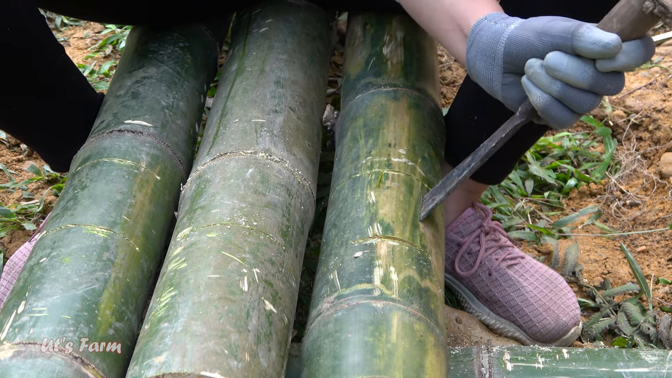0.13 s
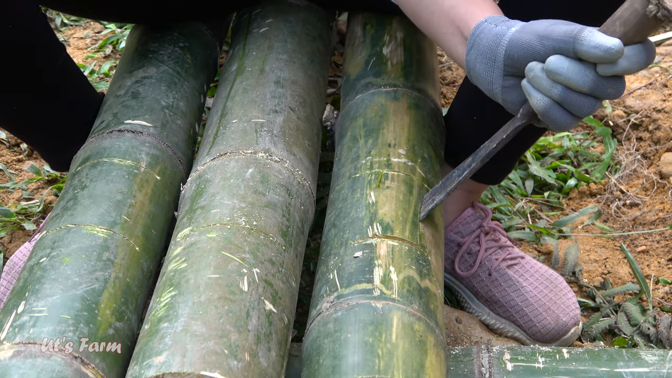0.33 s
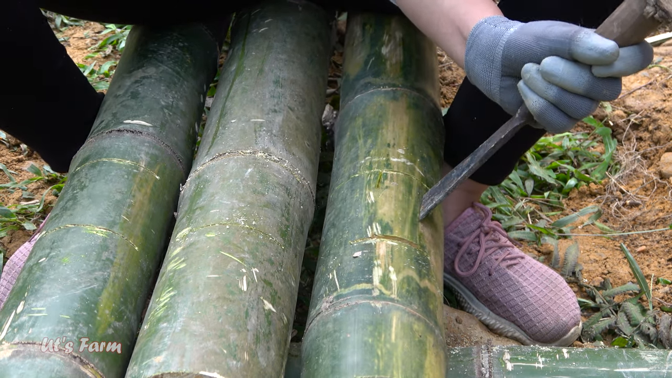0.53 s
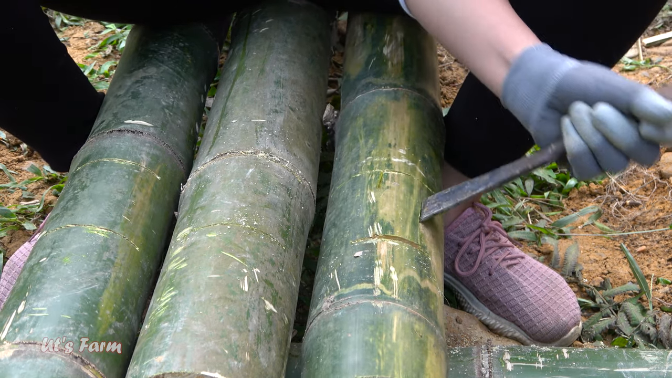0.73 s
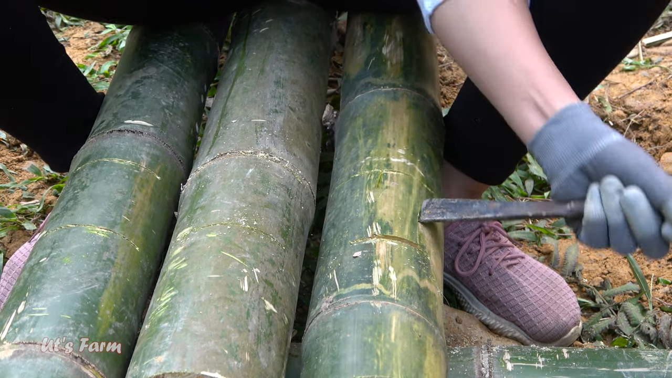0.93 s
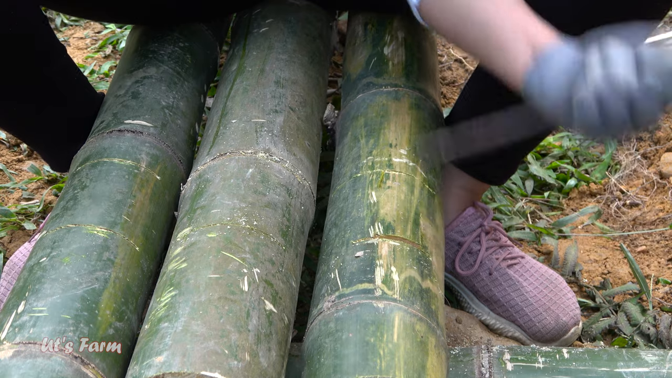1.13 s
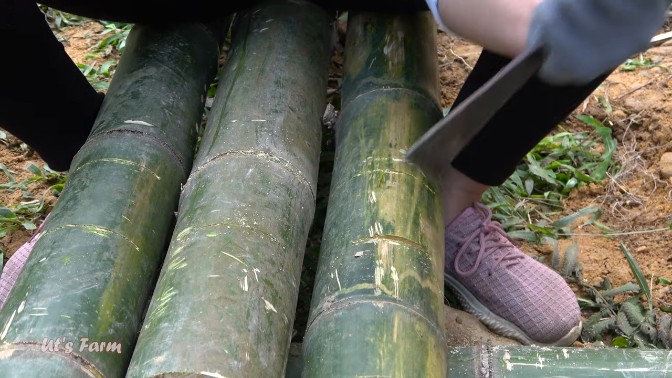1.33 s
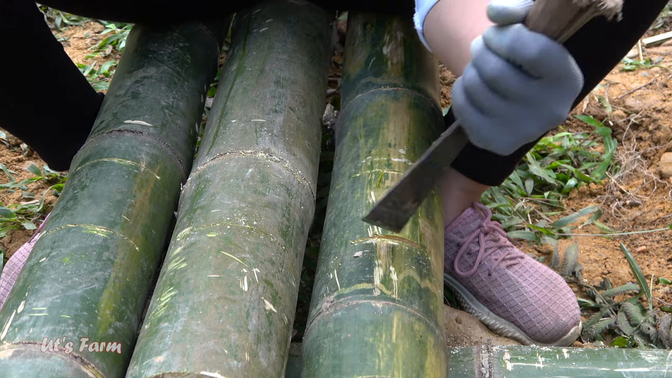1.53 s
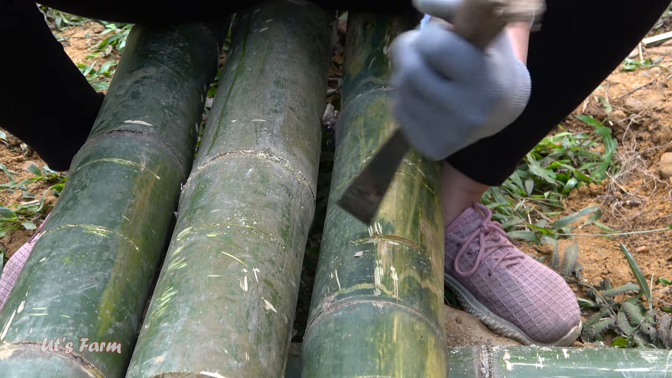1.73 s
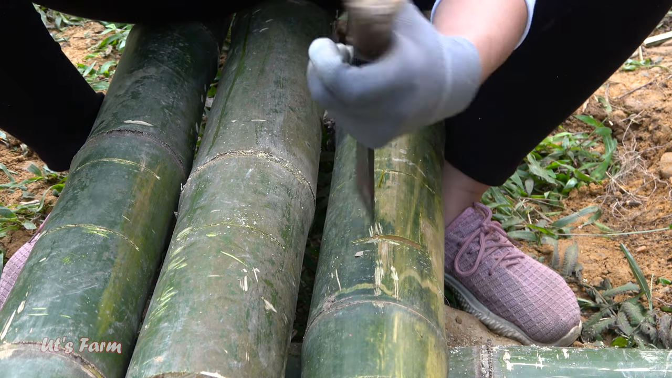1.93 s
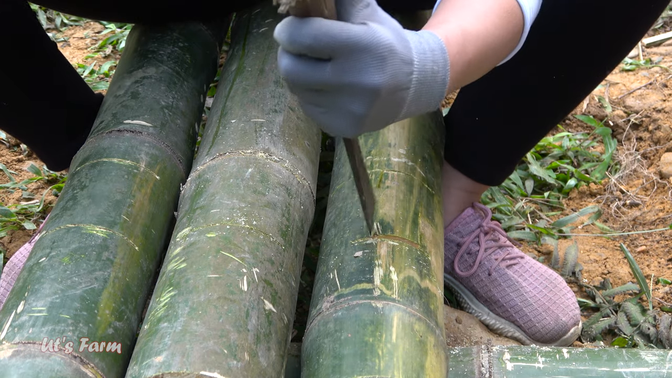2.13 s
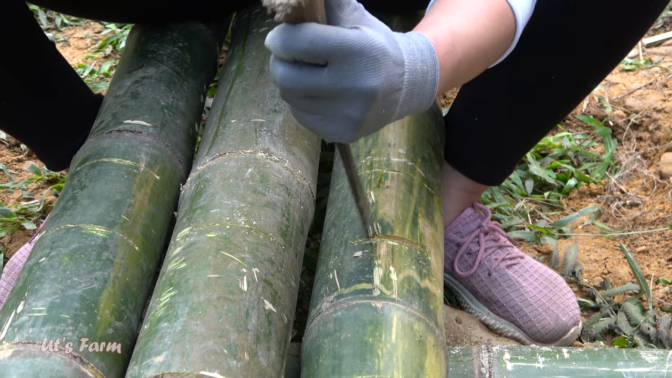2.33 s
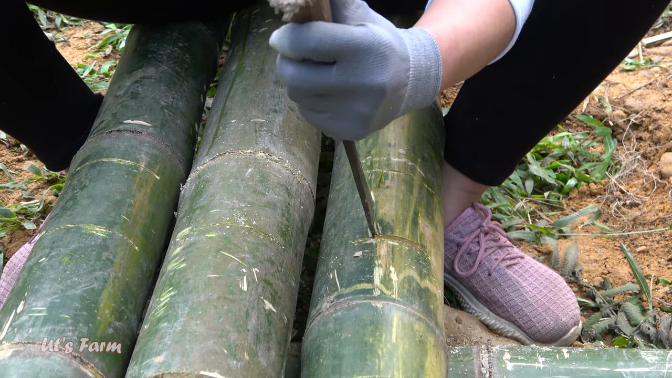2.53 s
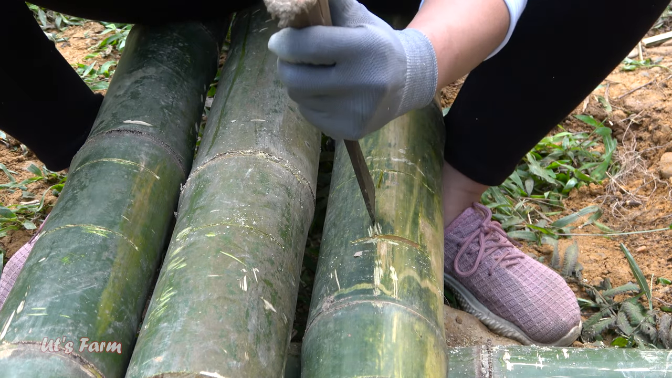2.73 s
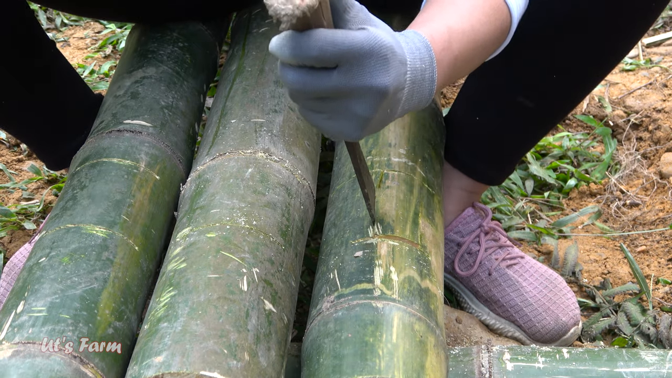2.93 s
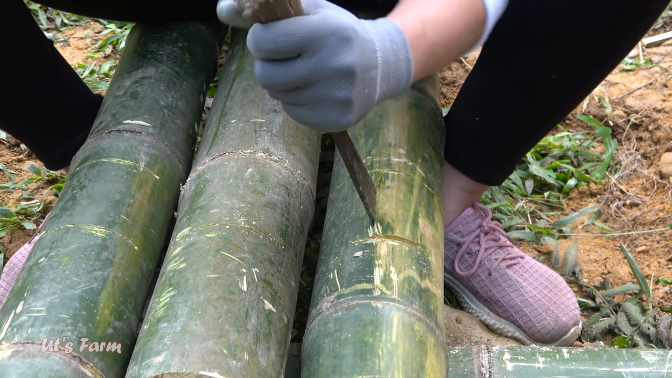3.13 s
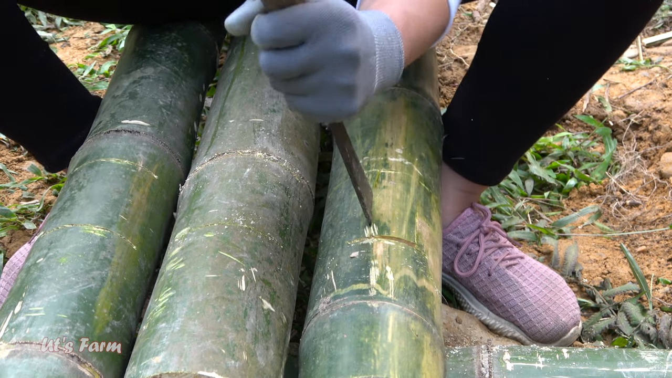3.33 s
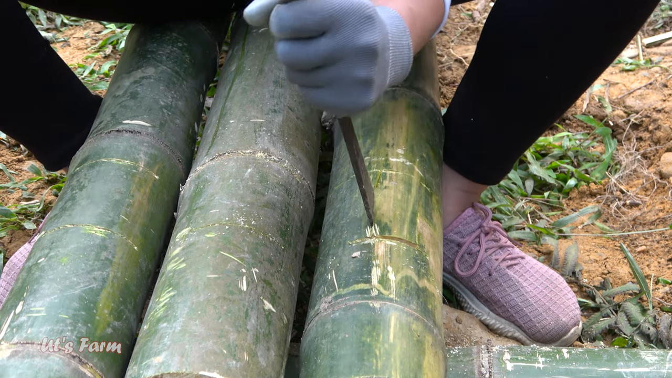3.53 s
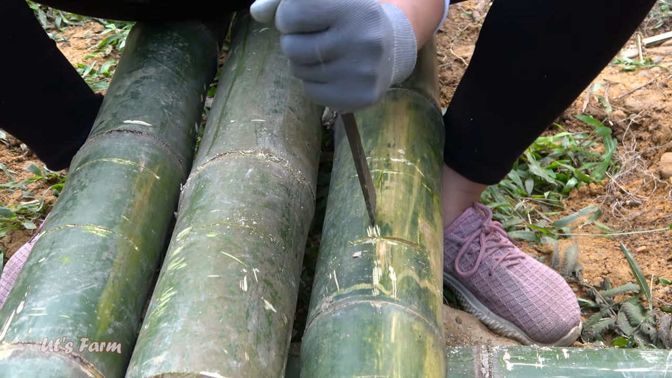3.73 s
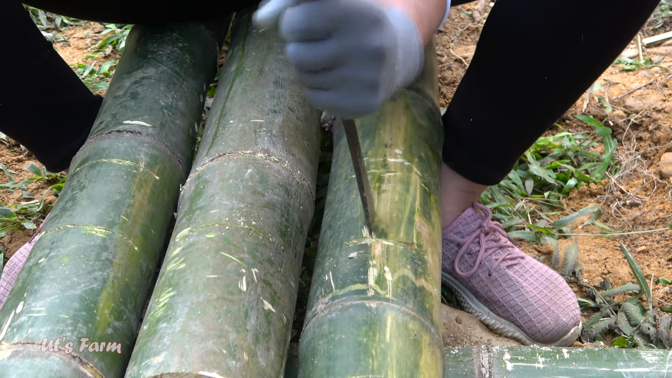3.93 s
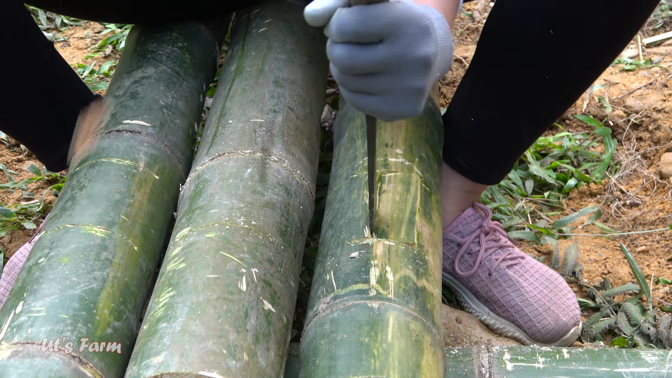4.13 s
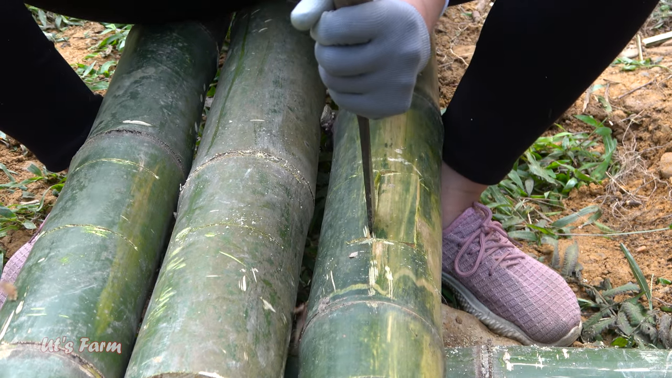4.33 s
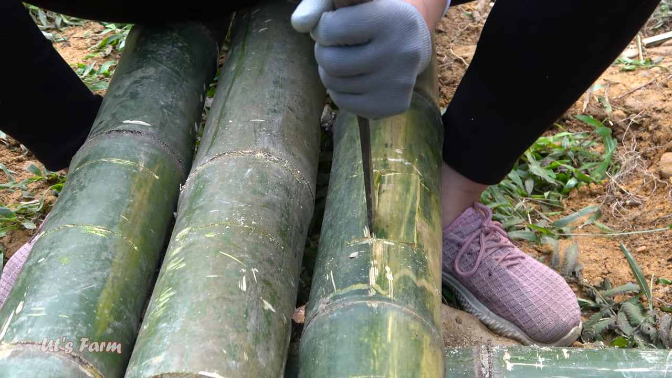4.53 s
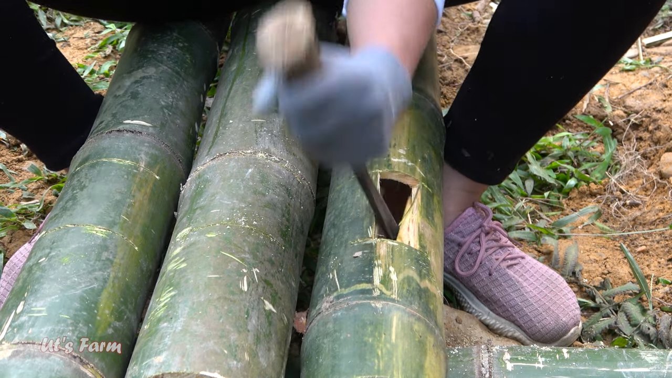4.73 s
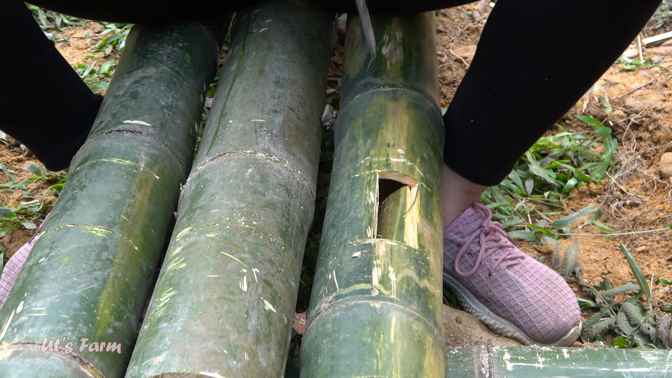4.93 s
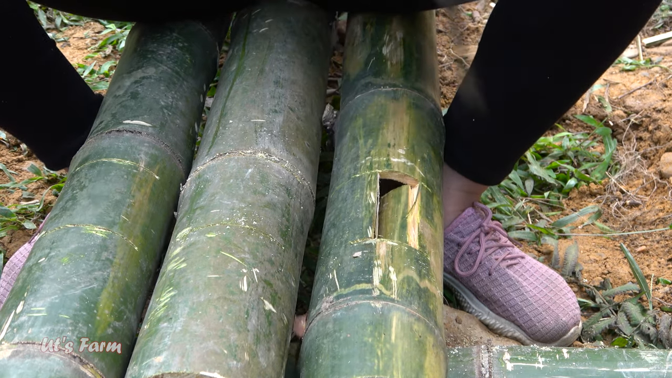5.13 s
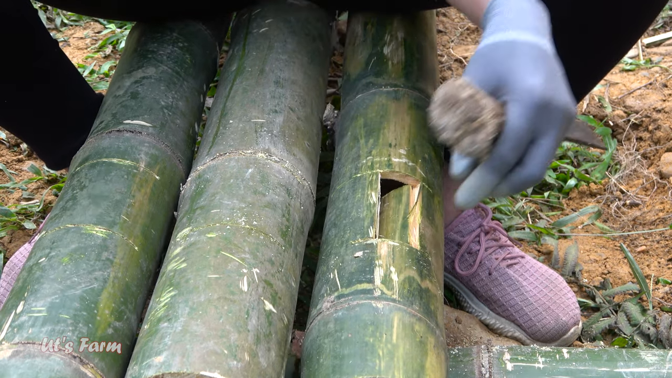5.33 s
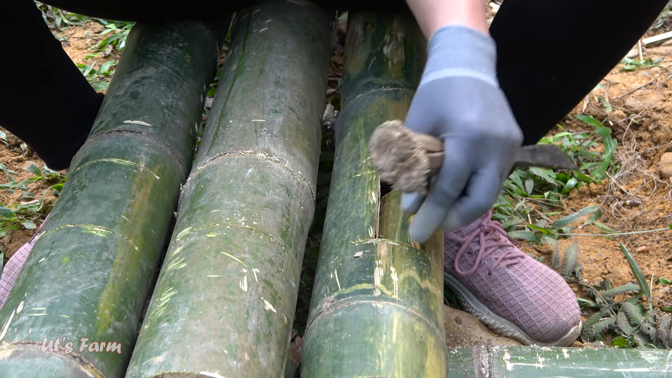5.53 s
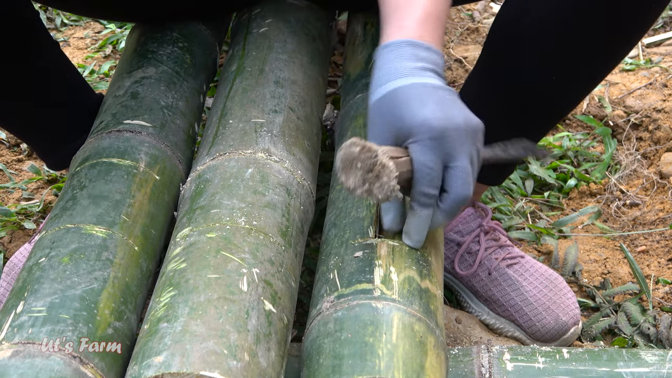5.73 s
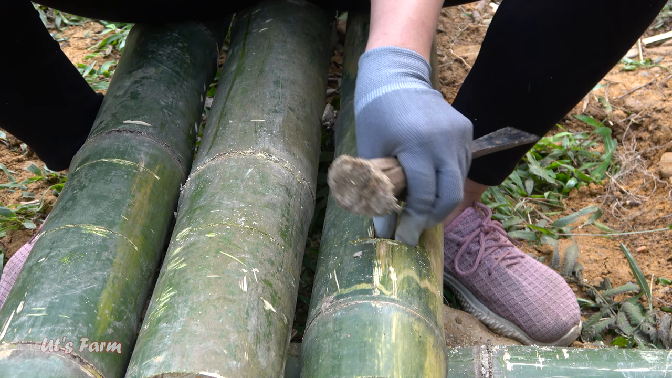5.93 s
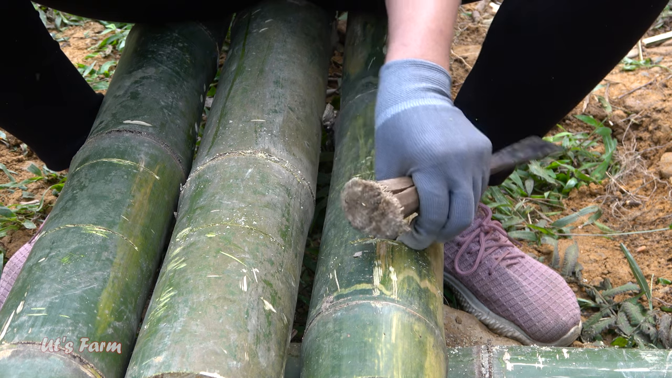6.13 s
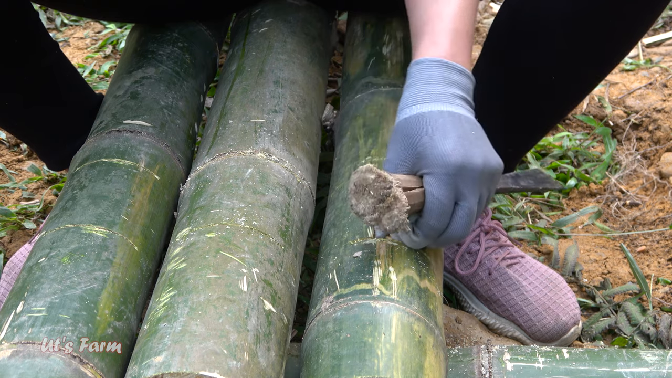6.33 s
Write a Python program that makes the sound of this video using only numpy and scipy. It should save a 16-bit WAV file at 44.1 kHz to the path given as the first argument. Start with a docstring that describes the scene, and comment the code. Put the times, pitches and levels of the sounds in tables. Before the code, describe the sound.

Outdoors, recorded close and quite dry, faint air and thin high insect chirring and trilling continue throughout. A light tap at the start leads to two strong chops into hollow bamboo at 0.2 and 0.6 seconds, each a sharp fibrous crack with a low-mid thud, slight rattle and short hollow ring. Dry fibres tick at 0.7 and around 1.1, then a distinct tap at 1.2. Light taps and scrapes occur from 1.4 to 2.7, including a woody knock at 1.9 and a clearer scrape at 2.7. Small snaps at 3.1 precede evenly spaced chops at 3.4, 3.7 and 4.0. Faint ticks come near 4.3. At 4.6 to 4.75, three blows crowd together, thinner and more open; a scrape and faint narrow hiss follow at 4.8. After near quiet from about 5.2, soft taps, scrapes and a tick run from 6.0 to 6.3.

```python
"""Insects chirr and trill over faint outdoor air throughout; a light tap, then two chops into a bamboo pole.
Each chop tears fibres in noisy snaps, then sends a falling thud along the pole and rings its wall and inner air.
Fibres tick, the blade taps and scrapes; three chops follow, then three closely spaced ones with the window open.
The blade slips out with a faint narrow hiss, and taps, scrapes and a tick close the scene.
Tones are decaying sines, everything rough is filtered noise, and the knife work has a faint scattered tail."""
import sys
import numpy as np
from scipy import signal
from scipy.fft import rfft, irfft, next_fast_len
from scipy.io import wavfile
from scipy.ndimage import uniform_filter1d

SR = 44100
rng = np.random.default_rng(int(sys.argv[2]) if len(sys.argv) > 2 else 0)


def bounce(signal):
    """Save signal as a 16-bit WAV file at the path given by the first command-line argument."""
    frames = np.transpose(np.atleast_2d(signal))
    limited = np.clip(frames, -1, 1)
    pcm = np.round(limited * 32767).astype(np.int16)
    wavfile.write(sys.argv[1], SR, pcm)


N = 286209

TIME = np.arange(N) / SR  # scene time, s
AGE = np.arange(SR // 2) / SR  # time since the start of one event, s
WINDOW_OPENS_S = 4.6  # later blows use the sound of the opened joint

# bending and ovalling modes of the pole wall: (frequency [Hz], relative level [dB], t60 [s])
WALL = [(150, -21, .2), (192, -13, .2), (229, -7, .22), (291, -1, .19), (329, 1, .18), (378, 1, .19),
        (409, -4, .18), (468, 0, .17), (612, 2, .11), (738, -4, .14), (895, -7, .13), (960, -6, .1),
        (1500, -14, .08), (1860, -22, .09), (2440, -27, .11), (2805, -22, .13), (3240, -30, .13)]


def undb(db):
    """Decibels to gain."""
    return 10 ** (np.asarray(db) / 20)


def unit(x):
    """Scale to rms 1."""
    return x / np.sqrt(np.mean(x ** 2))


def add(out, start_s, x):
    """Mix a stereo sound in at its start time."""
    first = max(int(start_s * SR), 0)
    out[:, first:first + x.shape[1]] += x[:, :N - first]


def noise(size, side_db=-14):
    """Stereo noise, alike left and right except for a side part at side_db."""
    mid, side = rng.standard_normal((2, size))
    return mid + undb(side_db) * side * np.array([[1], [-1]])


def colour(x, curve):
    """Filter by a dB curve over octaves (log2 Hz); rms 1."""
    size = next_fast_len(x.shape[-1])
    octave = np.log2(np.maximum(np.arange(size // 2 + 1) * SR / size, 1))
    filtered = irfft(rfft(x, size) * undb(curve(octave)), size)
    return unit(filtered[..., :x.shape[-1]])


def band(x, hz, octaves):
    """A bell-shaped band, 10 dB down at the given distance from its centre; rms 1."""
    return colour(x, lambda octave: -10 * ((octave - np.log2(hz)) / octaves) ** 2)


def burst(x, shape):
    """Noise under an envelope, carrying just the energy of that envelope."""
    return unit(x * shape) * np.sqrt(np.mean(shape ** 2))


def uneven_steps(size, hold, spread_db):
    """A gain that jumps at random within +-spread_db and holds for some samples."""
    levels_db = spread_db * (2 * rng.random(size // hold + 1) - 1)
    return np.repeat(undb(levels_db), hold)[:size]


def grains(size, spread_db):
    """Noise broken into half-millisecond snaps of uneven strength."""
    return noise(size) * uneven_steps(size, int(SR / 2000), spread_db)


def bundles(spread_db):
    """Fibres give way in bundles: an uneven gain that steps from one to the next; rms 1."""
    hold = int(.003 * SR)  # 3 ms per bundle
    steps = uneven_steps(len(AGE), hold, spread_db)
    return unit(uniform_filter1d(steps, size=hold // 4))  # soften the steps


def fade(t60, delay=0, rise=0.00088):
    """An envelope that rises after a delay and dies away; all times in seconds."""
    t = np.maximum(AGE - delay, 0)
    return (1 - np.exp(-t / rise)) * np.exp(-np.log(1000) * t / t60)


def swell(half_s):
    """A bell-shaped envelope that peaks after twice half_s."""
    return np.exp(-(AGE / half_s - 2) ** 2)


def wander(count):
    """A slow random curve through count points; spread near 1."""
    return np.interp(TIME, np.linspace(0, TIME[-1], count), rng.standard_normal(count))


def leftward(x, pan_db):
    """Tip the stereo balance leftward by pan_db from channel to channel."""
    return x * undb(np.array([[pan_db], [-pan_db]]) / 2)


def tilted(modes, tilt_db):
    """Tilt the modes about 600 Hz in dB per octave: a harder contact favours the higher ones."""
    return [(hz, db + tilt_db * np.log2(hz / 600), t60) for hz, db, t60 in modes]


def travel(hz):
    """Delay of bending waves, slower the lower they are down to 270 Hz, so the bass comes late."""
    return .011 * (380 / np.maximum(hz, 270)) ** 1.2


def ring(modes, path=1, phase_spread=0.091):
    """Decaying modes that swell as their waves cover the path; each blow excites them a little differently."""
    scatter_db = 2
    out = 0
    variations = rng.standard_normal((len(modes), 3))
    for k, ((hz, db, t60), (size, pitch, phase)) in enumerate(zip(modes, variations)):
        lag = path * travel(hz)
        detuned_hz = hz * (1 + .002 * pitch)
        # the phase shift is opposite left and right
        stereo_phase = phase_spread * phase * np.array([[1], [-1]])
        tone = np.sin(2 * np.pi * detuned_hz * (AGE - lag) + stereo_phase)
        sign = (-1) ** (k // 2)  # the mode shapes face the microphone with differing signs
        out = out + sign * undb(db + scatter_db * size) * fade(t60, lag, lag / 2) * tone
    return out


def woody(x, modes, t60, ring_db):
    """Add to x the brief ring that it draws from the modes above 1 kHz."""
    brief = sum(fade(t60) * np.sin(2 * np.pi * hz * AGE) for hz, _, _ in modes if hz > 1000)
    resonance = signal.fftconvolve(x, brief[None], axes=1)[:, :len(AGE)]
    return unit(x) + undb(ring_db) * unit(resonance)


def air(blow_s):
    """The pipe modes of the hollow joint at the time of a blow: closed, or with its window open."""
    # closed joint, nearly a harmonic series: (frequency [Hz], relative level [dB], t60 [s])
    closed_joint = [(536, 1, .22), (1075, -12, .15), (1595, -12.5, .18), (2115, -16, .14), (2640, -16, .14)]
    # joint with its window broken open: (frequency [Hz], relative level [dB], t60 [s])
    open_joint = [(553, -8, 0.26), (655, -6.5, 0.18), (936, -7.5, 0.11), (1099, -2, 0.17),
                  (1320, -16, 0.081), (1610, -6.5, .17), (1900, -34, .12), (2130, -12.5, 0.16),
                  (2697, -21.5, 0.29), (3040, -24, 0.11)]
    return open_joint if blow_s > WINDOW_OPENS_S else closed_joint


def field():
    """Faint outdoor air: noise shaped by a broad spectrum, wavering slowly in level."""
    # spectrum of the air: (frequency [Hz], relative level per Hz [dB])
    air_spectrum = [(15, -15), (25, -3.5), (87, -3.5), (180, -4.5), (285, -9), (405, -9.5), (659, -8),
                    (1400, -11.5), (2610, -19.5), (4250, -22), (5000, -24.5), (6920, -20), (8140, -25),
                    (16000, -29.5)]
    mean_db, waver_db = -55, 2.54
    hz, db = np.transpose(air_spectrum)
    hiss = colour(noise(N, side_db=-11.5), lambda octave: np.interp(octave, np.log2(hz), db))
    return leftward(hiss, pan_db=1.54) * undb(mean_db - waver_db * wander(count=30))


def surroundings(x):
    """Ground and plants scatter back a faint mid-range tail: convolution with decaying noise."""
    wet_db, t60, build_s = -32, 0.93, 0.04
    t = np.arange(SR) / SR
    envelope = undb(-60 * t / t60) * (1 - np.exp(-t / build_s))
    echo = band(noise(SR, side_db=-36.0), 1800, 2.3) * envelope
    return undb(wet_db) * signal.fftconvolve(x, unit(echo) / np.sqrt(SR), axes=1)[:, :N]


def insects():
    """Two narrow noise bands: one chirrs in even phrases, a lower one trills louder in bouts."""
    # louder bouts of the lower insect: (start [s], end [s])
    trill_bouts = [(0, 1.53), (2.25, 3.25), (4.1, 6.49)]
    chirr_db, chirr_hz, period_s, first_peak_s = -66.5, 6900, .304, .07
    trill_db, trill_hz, rest_db, swell_db = -68, 4210, -5, 4.7

    phrase = np.clip(0.88 + 1.2 * np.cos(2 * np.pi * (TIME - first_peak_s) / period_s), 0, 1)
    chirr = undb(chirr_db) * phrase * band(noise(N, side_db=-3), chirr_hz, .06)

    active = sum(1. * ((TIME >= start) & (TIME < end)) for start, end in trill_bouts)
    active = uniform_filter1d(active, size=SR // 8)  # soften the edges over an eighth of a second
    level_db = trill_db + rest_db * (1 - active) + swell_db * wander(count=40)
    trill = undb(level_db) * band(noise(N, side_db=-25.5), trill_hz, 0.14)
    return chirr + trill


def scrapes():
    """Blade, glove and chips slide in dense tiny slips, coloured by the wall's short high resonances."""
    # slides that swell and fade: (middle [s], half length [s], level [dB], centre [Hz])
    slides = [(1.4, 0.05, -59.5, 8000), (1.818, 0.038, -51, 6750), (1.978, 0.096, -63.5, 7000),
              (2.703, 0.026, -42.5, 2580), (4.809, 0.043, -43, 3270), (5.975, 0.075, -56.5, 12000),
              (6.285, 0.059, -52.5, 3980)]
    out = np.zeros((2, N))
    for middle_s, half_s, db, hz in slides:
        slips = woody(grains(len(AGE), spread_db=7), WALL, t60=0.0099, ring_db=-5.5)
        envelope = swell(half_s) * bundles(spread_db=6)
        add(out, middle_s - 2 * half_s, undb(db) * envelope * band(slips, hz, 2.5))
    return out


def blade_slip():
    """The blade sings faintly as it slips out of the window: a swell of very narrow noise."""
    middle_s, half_s, db, hz = 4.838, .02, -50, 5500
    out = np.zeros((2, N))
    add(out, middle_s - 2 * half_s, undb(db) * swell(half_s) * band(noise(len(AGE)), hz, .04))
    return out


def snaps():
    """Single fibres snap under the prying blade: dry, bright ticks too light to ring the pole."""
    # fibre ticks: (time [s], level [dB], centre [Hz])
    ticks = [(0.727, -32.5, 5850), (1.062, -43, 2810), (1.109, -30.5, 3430), (1.158, -35, 3460),
             (3.12, -39, 6860), (3.155, -33.5, 4100), (4.269, -42.5, 8800), (6.109, -41, 4060)]
    out = np.zeros((2, N))
    for s, db, hz in ticks:
        tick = burst(band(grains(len(AGE), spread_db=4), hz, 1.75), fade(t60=0.025))
        add(out, s, undb(db) * tick)
    return out


def taps():
    """A light touch clicks and rings mainly the wall modes that the spot favours, close to the blade."""
    # blade and chips knock on the pole:
    # (time [s], click level [dB], click centre [Hz], ring level [dB], centre of the favoured modes [Hz])
    knocks = [ (.006, -37.5, 1820, -35, 441), (1.178, -24, 2000, -26.5, 613),
              (1.348, -47.5, 2000, -48, 640), (1.906, -32, 2030, -28.5, 584), (2.34, -41, 2500, -46.5, 365),
              (2.43, -39, 3000, -43, 560), (2.719, -34, 2600, -35, 543), (4.285, -34.5, 1910, -36, 1080),
              (4.777, -48, 2200, -21.5, 820), (4.801, -31, 2400, -31.5, 890),
              (4.882, -34.5, 2660, -40.5, 895), (5.984, -29.5, 4230, -35, 770),
              (6.227, -35, 3600, -38, 1400), (6.299, -51, 1900, -41.5, 700)]
    spot_db_per_octave = 24.5  # how fast the modes fall away from the favoured ones
    air_db, air_tilt_db = -15.5, 5  # joint air relative to the wall ring; tilt per octave
    out = np.zeros((2, N))
    for s, click_db, click_hz, ring_db, spot_hz in knocks:
        # taps ring a little shorter than chops
        modes = [(hz, db - spot_db_per_octave * abs(np.log2(hz / spot_hz)), 0.93 * t60)
                 for hz, db, t60 in WALL]
        joint = air(s)
        contact = woody(grains(len(AGE), spread_db=4), WALL + joint, t60=0.02, ring_db=-2)
        click = burst(band(contact, click_hz, 1.59), fade(t60=0.031))
        joint_ring = ring(tilted(joint, air_tilt_db), path=0.307)
        tones = ring(modes, path=.3) + undb(air_db) * joint_ring
        add(out, s, undb(click_db) * click + undb(ring_db) * leftward(tones, pan_db=2.5))
    return out


def tearing(tear_s, crack_db, opened):
    """Fibres snap while the edge sinks in: a bright crack band and a lower splinter band of grains."""
    # a longer tear spreads the same crack energy and sounds duller than one of reference length
    reference_s, dulling = 0.015, 0.14
    crack_base_db, crack_base_hz, crack_fade_s = -27.5, 5450, 0.0072
    splinter_base_db, splinter_fade_s = -19, 0.0063
    splinter_share = 0.17  # dB more splintering for each dB of crack
    splinter_hz = 1440 if opened else 1111
    bite_rise_s = 0.00033

    resting = np.maximum(AGE - tear_s, 0)  # time since the edge stopped
    spreading = np.sqrt((reference_s + crack_fade_s) / (tear_s + crack_fade_s))
    bite = (1 - np.exp(-AGE / bite_rise_s)) * spreading
    uneven = bundles(spread_db=4)

    crack_hz = crack_base_hz * (reference_s / tear_s) ** dulling
    crack_noise = uneven * band(grains(len(AGE), spread_db=11.5), crack_hz, 1.26)
    crack = burst(crack_noise, bite * np.exp(-resting / crack_fade_s))

    splinter_noise = uneven * band(grains(len(AGE), spread_db=8), splinter_hz, 1.21)
    splinter = burst(splinter_noise, bite * np.exp(-resting / splinter_fade_s))
    splinter_gain = undb(splinter_base_db + splinter_share * crack_db)
    return undb(crack_base_db + crack_db) * crack + splinter_gain * leftward(splinter, pan_db=1.5)


def thud(start_hz):
    """The first bending wave, spread by the pole into a brief tone gliding towards 300 Hz."""
    hz = 300 + (start_hz - 300) * np.exp(-AGE / .04)
    envelope = (1 - np.exp(-AGE / .003)) * np.exp(-(AGE / .04) ** 2)
    return np.sin(2 * np.pi * np.cumsum(hz) / SR) * envelope


def rattle(tilt_db):
    """Stacked poles rattle: half-octave noise bands as crowded short resonances, the low ones late."""
    # rattle relative to the wall: (frequency [Hz], level per half octave [dB], t60 [s])
    rattle_curve = [(59.5, -43, 0.55), (107.7, -20, 0.11), (300, -12, .14), (550, -9, .13), (1000, -9, .14),
                    (2150, -21.5, 0.22), (4230, -32.5, 0.29), (8000, -36.5, 0.29), (15330, -44, 0.28)]
    f, dbs, t60s = np.transpose(rattle_curve)
    centres = 62 * 2 ** (np.arange(17) / 2)
    centre_dbs = np.interp(np.log(centres), np.log(f), dbs)
    centre_t60s = np.interp(np.log(centres), np.log(f), t60s)
    out = 0
    for hz, db, t60 in tilted(zip(centres, centre_dbs, centre_t60s), tilt_db):
        envelope = fade(t60, travel(hz), travel(hz) / 2)
        out = out + undb(db) * burst(band(noise(len(AGE)), hz, .45), envelope)
    return out


def chops():
    """Each blow tears fibres, then the pole thuds, rattles and rings in its wall and its inner air."""
    # chops: (time [s], force [dB], tearing time [s], crack [dB], thud start [Hz],
    #         wall [dB], wall tilt [dB per octave], air [dB])
    blows = [ (0.229, -1, 0.003, -1.5, 671, 0.5, 0, -5.5), (0.576, 2.5, 0.011, -5, 784, -4, 0.5, -6),
             (3.358, -7.5, 0.003, 12.5, 1000, 3.5, 1, -3.5), (3.680, -3.5, 0.004, 3, 739, 3, 1.1, -2.5),
             (4.001, 1, 0.023, -4, 632, -2, 2.5, -2.5), (4.640, -3, 0.0108, 3.5, 890, 0, 2.5, 3.5),
             (4.719, -18.5, 0.006, 10, 677, 9, 0, -2), (4.74, -2.5, 0.00375, 1, 700, -13, 0, -7.5)]
    wall_base_db, rattle_base_db, thud_base_db, air_base_db = -12.5, -8.5, -15.5, -9.5
    open_wall_db, open_thud_db = -6.5, -3  # the pole sounds thinner once the window is open
    push_share = 0.28  # share of the tear that passes before the pole takes the blow
    out = np.zeros((2, N))
    for s, force_db, tear_s, crack_db, thud_hz, wall_db, tilt_db, air_db in blows:
        opened = s > WINDOW_OPENS_S
        wall_ring = undb(wall_base_db + opened * open_wall_db) * ring(tilted(WALL, tilt_db))
        stack = undb(rattle_base_db) * rattle(tilt_db)
        first_wave = undb(thud_base_db + opened * open_thud_db) * thud(thud_hz)
        joint_ring = undb(air_base_db + air_db) * ring(air(s))
        pole = undb(wall_db) * (wall_ring + stack + first_wave) + joint_ring
        add(out, s, undb(force_db) * tearing(tear_s, crack_db, opened))
        # the pole radiates from a little left of the blade
        add(out, s + push_share * tear_s, undb(force_db) * leftward(pole, pan_db=1.0))
    return out


def scene():
    """Field and insects behind the knife work on the pole and its scattered tail."""
    work = scrapes() + blade_slip() + snaps() + taps() + chops()
    return field() + insects() + surroundings(work) + work


def record(dry):
    """The recorder rounds the loudest peaks, softens both ends of the range and cuts the top."""
    low_hz, high_hz, top_hz = 28, 13000, 15750
    rounded = .75 * np.tanh(dry / .75)
    gentle = signal.butter(2, [low_hz, high_hz], "bandpass", fs=SR, output="sos")
    steep = signal.ellip(8, .2, 70, top_hz, fs=SR, output="sos")
    return signal.sosfilt(steep, signal.sosfilt(gentle, rounded))


dry = scene()
out = record(dry)
bounce(out)
```